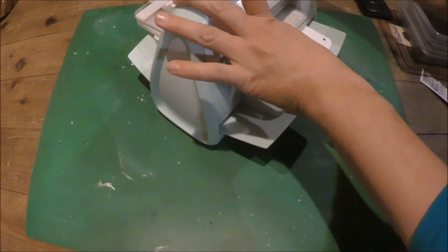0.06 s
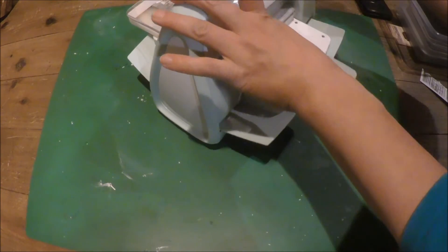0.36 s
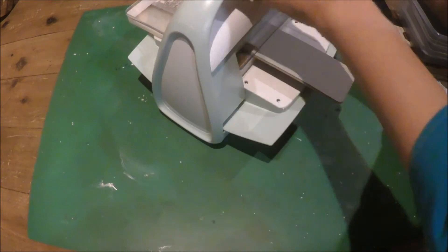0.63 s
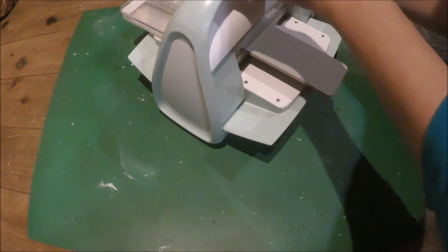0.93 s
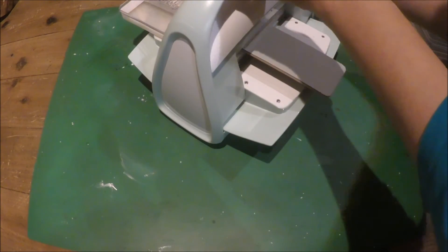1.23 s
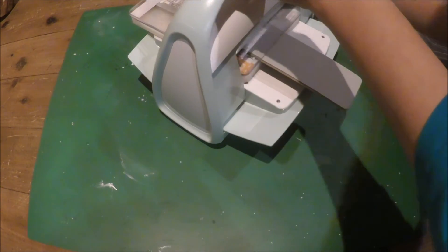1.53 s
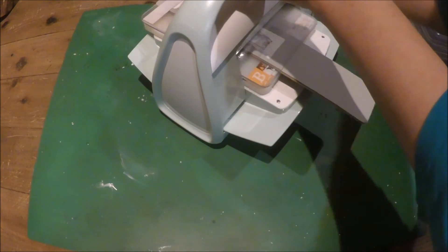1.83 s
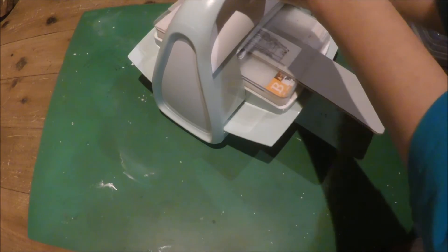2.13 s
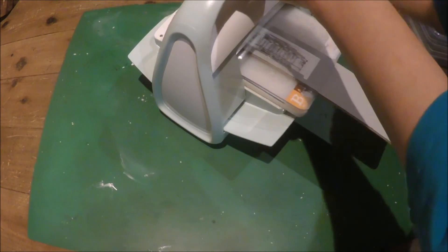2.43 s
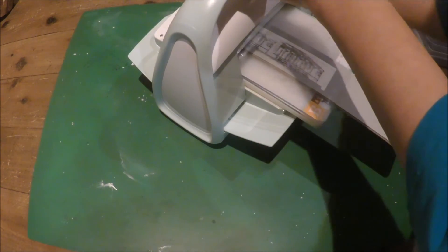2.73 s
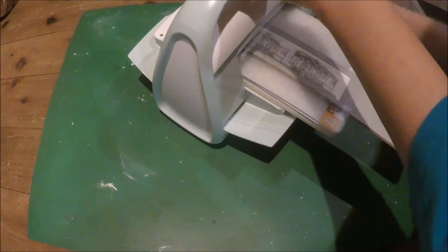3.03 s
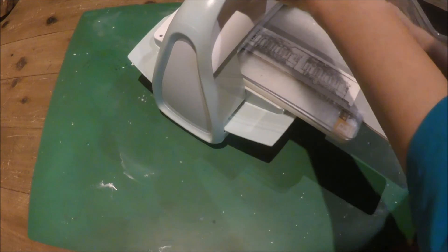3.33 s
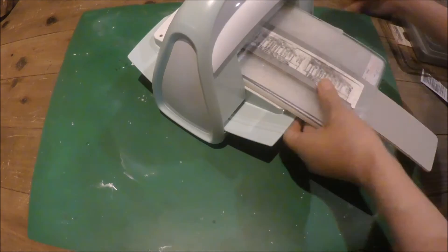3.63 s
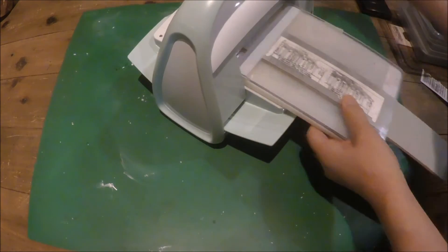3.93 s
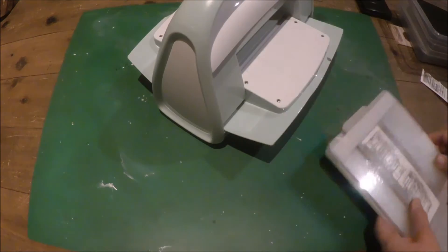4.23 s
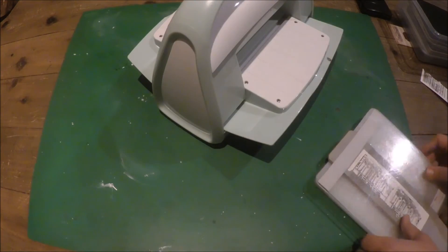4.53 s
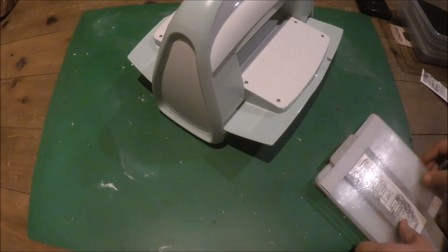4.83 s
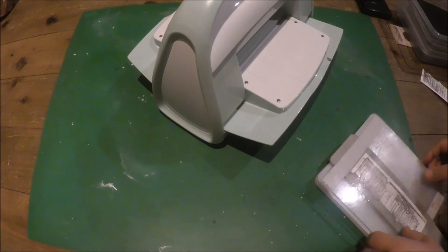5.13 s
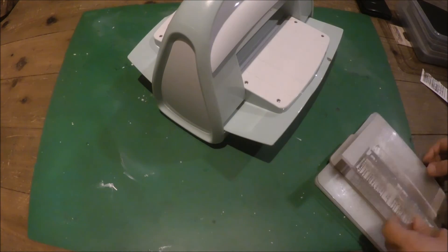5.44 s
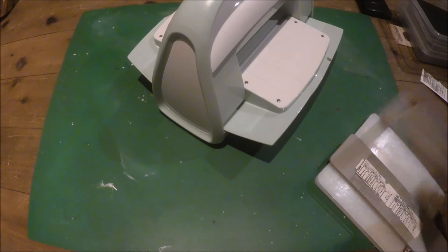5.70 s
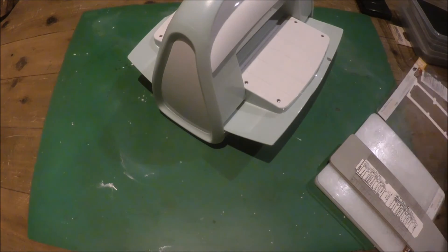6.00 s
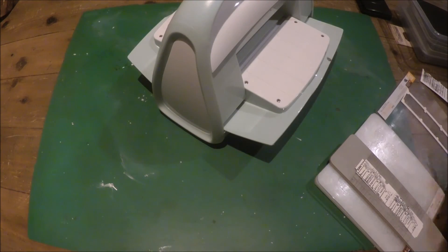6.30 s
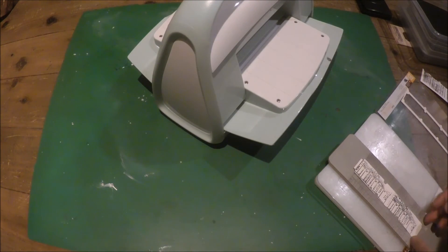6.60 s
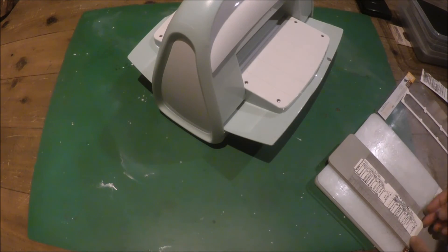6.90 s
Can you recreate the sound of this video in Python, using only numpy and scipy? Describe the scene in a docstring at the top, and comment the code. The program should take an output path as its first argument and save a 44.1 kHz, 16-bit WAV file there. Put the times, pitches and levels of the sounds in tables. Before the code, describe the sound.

A hand-cranked die-cutting machine turns with a low gear rumble, and a loud plastic clack comes almost at once. Plastic plates then creak, click and crunch through the rollers and snap free with another clack. The cranking stops. The plates scrape out, land on the table with a hard knock, and are clapped apart, with small rubs and clicks after. The sound is close and slightly dull, in a small room.

```python
"""A hand-cranked die-cutting machine

The machine stands on a mat-covered table, close by in a small room. Its gear teeth drive the resonances
of the plastic housing while a stack of plates creaks through the rollers by stick-slip and snaps free.
The plates are slid out, set down and clapped apart: friction makes them hiss, and impact excites their
damped modes. The hardest clacks overload the microphone."""
import sys
import numpy as np
from scipy import signal
from scipy.fft import rfft, irfft, next_fast_len
from scipy.io import wavfile
from scipy.ndimage import map_coordinates

SR = 44100
rng = np.random.default_rng(int(sys.argv[2]) if len(sys.argv) > 2 else 0)


def dump_mix(stems):
    """Bounce the given channels to the path in sys.argv[1] as a 16-bit WAV at rate SR."""
    frames = np.atleast_2d(stems).T  # one column per channel
    limited = np.clip(frames, -1, 1)  # hard clip at full scale
    pcm = np.round(limited * 32767).astype(np.int16)
    wavfile.write(sys.argv[1], SR, pcm)


N = 315756

# Modes of the feed tray and of one plate. Each row: frequency in Hz, level in dB, t60 in seconds.
TRAY_MODES = [(731, -3, 0.05), (778, -2.5, 0.0091), (885, 4, 0.016), (1014, 0, 0.03), (1110, -4, 0.021),
              (1240, -11.5, 0.039)]
PLATE_MODES = [(1526, -4.5, 0.024), (1708, -9.5, 0.044), (1850, -3, 0.032), (1943, -4, 0.04),
               (2050, -5, .035), (2290, -1.5, 0.018), (2370, -6, 0.045), (2664, -8.5, 0.015),
               (3305, -18, .025)]
# Spectrum of a struck edge. Each row: frequency in Hz, relative density in dB.
EDGE_SPECTRUM = [(200, -19), (900, 2.5), (2200, 0.5), (3500, -1), (5200, -12), (7000, -19), (15000, -20.5)]
# Resonances of the squeezed plates. Each row: frequency in Hz, width in Hz, level in dB.
SQUEEZE_PEAKS = [(968, 360, -1.5), (1087, 160, 5), (1850, 250, -5.5), (2590, 140, -13.5)]
# The stack is pulled out, set down, settled and opened.
# Each row: start and length in seconds, hiss and rub levels in dB.
HAND_MOVES = [(3.68, 0.58, -51.5, -48.5), (4.39, 0.51, -58.5, -46.5), (4.936, 0.38, -59.5, -55),
              (5.755, 0.21, -53, -52), (6.027, 0.323, -56, -47.5)]
# The rollers grip the stack, then free it; the pressure takes a moment to build and to ease.
GRIP_S, FREE_S, GRIP_RISE_S, FREE_FALL_S = 1.22, 3.2, .25, .15


def amp(db):
    """Decibels as an amplitude ratio."""
    return 10 ** (np.asarray(db) / 20)


def unit(x):
    """x scaled to rms 1."""
    return x / np.sqrt(np.mean(x ** 2) + 1e-20)


def along(points, hz):
    """Interpolation of (Hz, value) points on a logarithmic frequency axis."""
    f, v = np.transpose(points)
    return np.interp(np.log(hz + 1), np.log(f + 1), v)


def wobble(rate):
    """A smooth random curve with rate knots a second."""
    return map_coordinates(rng.standard_normal(int(N * rate / SR) + 4), [np.arange(N) * rate / SR])


def filtered(x, response):
    """Linear filtering: the spectrum of x times a complex frequency response."""
    m = next_fast_len(len(x) + 8192)
    return irfft(rfft(x, m) * response(np.fft.rfftfreq(m, 1 / SR)), m)[:len(x)]


def coloured(x, spectrum):
    """Spectral shaping of x by (Hz, dB) points, at rms 1."""
    return unit(filtered(x, lambda hz: amp(along(spectrum, hz))))


def resonate(x, peaks):
    """Forced vibration, at rms 1; a small body radiates little below its lowest resonance."""
    def response(f):
        bank = sum((-1) ** k * amp(db) * 1j * f * width / (hz * hz - f * f + 1j * f * width)
                   for k, (hz, width, db) in enumerate(peaks))
        return bank * f * f / (f * f + peaks[0][0] ** 2)
    return unit(filtered(x, response))


def grains(rate, spread_db):
    """Shot noise: tiny impulses of random size, on average rate a second."""
    return (rng.random(N) < rate / SR) * rng.standard_normal(N) * amp(spread_db * rng.standard_normal(N))


def waver(hz, drift, flutter_db):
    """A tone of rms 1, modulated in frequency and amplitude by an unsteady hand."""
    phase = 2 * np.pi * np.cumsum(hz * (1 + drift * wobble(25))) / SR
    return unit(np.sin(phase) * amp(flutter_db * wobble(22)))


def held(start, end, rise=.024, fall=.13):
    """An envelope that rises from start, holds at 1 until end and then falls."""
    t = np.arange(N) / SR
    return np.clip(np.minimum((t - start) / rise, 1 - (t - end) / fall), 0, 1)


def arch(start, length):
    """An envelope that swells and fades in one rounded arch."""
    progress = np.clip((np.arange(N) / SR - start) / length, 0, 1)
    return np.sqrt(np.abs(np.sin(np.pi * progress)))


def scattered(start, end, rate, db, spread_db):
    """Small events at log-normal intervals. Each row: time in seconds, level in dB."""
    gaps, sizes = rng.standard_normal((64, 2)).T
    times = start + np.cumsum(np.exp(gaps / 2)) / rate
    return [(s, db + spread_db * size) for s, size in zip(times, sizes) if s < end]


def ring(modes, attack, rattle):
    """Free vibration of damped modes, at peak 1; loose contact smears each mode into a band."""
    t = np.arange(SR // 4) / SR
    hz, db, t60 = np.transpose(modes)[:, :, None]
    size = amp(db + 1.5 * rng.standard_normal(hz.shape))
    detune = 1 + .012 * rng.standard_normal(hz.shape)
    sign = np.where(np.arange(len(hz)) % 3 == 2, -1, 1)[:, None]
    fading = size * np.exp(-np.log(1000) * t / t60)
    clean = np.sum(sign * fading * np.sin(2 * np.pi * hz * detune * t), axis=0)
    smear = resonate(rng.standard_normal(len(t)), [(f, f / 5, level) for f, level, _ in modes])
    wave = clean + rattle * smear * np.sqrt(np.sum(fading ** 2, axis=0) / 2)
    wave *= 1 - np.exp(-t / attack)
    return wave / np.abs(wave).max()


def crack(spectrum, t60):
    """Modal overlap: the crowded high modes of a struck edge merge into decaying noise."""
    t = np.arange(SR // 4) / SR
    return coloured(rng.standard_normal(len(t)), spectrum) * np.exp(-np.log(1000) * t / t60) / 2


def add(track, s, hit, wet_db):
    """Reverberation: a hit is placed at time s together with its diffuse tail in the room."""
    # Decay of the room. Each row: frequency in Hz, t60 in seconds.
    room_decay = [(150, 0.14), (1000, 0.18), (4000, 0.3), (10000, 0.23)]
    hz, t, noise = signal.stft(rng.standard_normal(len(hit)), SR, nperseg=256)
    decay = np.exp(-np.log(1000) * t / along(room_decay, hz)[:, None])
    tail = signal.istft(noise * decay, SR, nperseg=256)[1]
    tail = np.pad(tail / np.linalg.norm(tail), (SR // 200, 0))  # 5 ms behind the direct sound
    heard = hit + amp(wet_db) * signal.fftconvolve(hit, tail)[:len(hit)]
    start = round(s * SR)
    track[start:start + len(hit)] += heard[:N - start]


def effort():
    """The driving effort at the crank in dB, per sample; none once the hand lets go."""
    # Effort as the gear rumble it makes. Each row: time in seconds, level in dB.
    crank = [(0.0, -38), (0.36, -37.5), (0.55, -49), (0.72, -54.5), (0.83, -36.5), (1.0, -51),
             (1.17, -47.5), (1.3, -37), (1.47, -32.5), (1.62, -43), (2.14, -43), (2.4, -37), (2.68, -37),
             (3.17, -41), (3.33, -45), (3.43, -65.5)]
    s, db = np.transpose(crank)
    return np.interp(np.arange(N) / SR, s, db, right=-200)


def friction_gain(db, growth, grip_db):
    """Friction noise rises with load: by growth dB per dB of effort, and by grip_db in the rollers."""
    usual_effort_db = -35
    grip = held(GRIP_S, FREE_S, GRIP_RISE_S, FREE_FALL_S)
    return amp(db + growth * (effort() - usual_effort_db) + grip_db * grip)


def room_air():
    """The noise floor: the quiet room and the microphone's own hiss."""
    # Each row: frequency in Hz, relative density in dB.
    floor_spectrum = [(15, -49.5), (25, -18), (301, -1.5), (591, -4.5), (695, -3), (754, -10), (1040, -6.5),
                      (2220, -12), (3620, -14.5), (5200, -21), (7500, -26), (12000, -23.5), (16000, -15)]
    return amp(-54) * coloured(rng.standard_normal(N), floor_spectrum)


def gears():
    """Forced vibration: gear teeth shake the housing, and its base booms on the table."""
    # Resonances of gearbox and base. Each row: frequency in Hz, width in Hz, level in dB.
    gearbox_peaks = [(210, 26, -12.5), (335.3, 11, 0), (374.8, 13, 1), (453.3, 25, 0.5), (476, 41, -1),
                     (571, 52, -14), (731, 60, -14), (951, 19, -12.5)]
    base_peaks = [(109, 23, 1.5), (139.7, 27, 9)]
    # Gear tones that sing through the housing. Each row: frequency in Hz, level in dB.
    gear_tones = [(355, -9), (482, -6.5), (875, -20.5)]
    rumble = resonate(grains(rate=1100, spread_db=1), gearbox_peaks)
    boom = amp(-5) * resonate(grains(rate=430, spread_db=-1), base_peaks)
    whine = sum(amp(db) * waver(hz, drift=.025, flutter_db=1) for hz, db in gear_tones)
    return amp(effort()) * (rumble + boom + whine)


def crunch():
    """Micro-slip: clumps of tiny slips excite the resonances of the squeezed plates."""
    slips = grains(rate=1300, spread_db=3) * amp(2.5 * wobble(60))
    return friction_gain(-50, growth=.4, grip_db=2) * resonate(slips, SQUEEZE_PEAKS)


def sliding():
    """Sliding friction: plastic moved by roller or hand hisses and catches in tiny ticks."""
    # Each row: frequency in Hz, relative density in dB.
    hiss_spectrum = [(300, -34.5), (1000, -3), (2000, 2), (3500, 4), (5200, -2.5), (7000, -8),
                     (15000, -8.5)]
    gain = friction_gain(-54.5, growth=.2, grip_db=5.5)
    gain += sum(amp(db) * held(s, s + length) ** 2 for s, length, db, _ in HAND_MOVES)
    pressure = amp(1.5 * wobble(20))
    friction = unit(grains(rate=10000, spread_db=3))
    catches = amp(-11.5) * unit(grains(rate=20, spread_db=1))
    return pressure * gain * coloured(friction + catches, hiss_spectrum)


def clacks():
    """Impact excitation: plates snap against the machine, and once clap against each other; housing, tray and
    plate ring, edges buzz."""
    # Each row: time in seconds, housing, tray, plate and edge levels in dB, edge t60 in seconds.
    impacts = [(0.4135, -31.5, -21.5, -20.5, -34.5, .034), (0.428, -4, 5, -8, -16.5, .015),
               (0.4403, -3, -0.5, 3.5, -10, 0.023), (0.4479, -3, -6, -7, -25, .025),
               (0.553, -22, -12, -14, -15, 0.088), (3.1932, -22.5, -25.5, -9.5, -21.5, .02),
               (3.201, -6.5, 3, -12, -15, 0.025), (3.8767, -16.5, -20, -12, -9, 0.05),
               (4.0797, -43, -24, -21, -17.5, 0.058), (5.770, -23.5, 0, -17.5, -6.5, 0.022)]
    # Each row: frequency in Hz, level in dB, t60 in seconds.
    housing_modes = [(128, -14, 0.18), (196, -4.5, 0.11), (247, -7.5, 0.036), (315, 3.5, .09),
                     (360, -7.5, 0.14), (440.4, 2.5, 0.097), (555, -13, 0.081)]
    track = np.zeros(N)
    for s, housing_db, tray_db, plate_db, edge_db, edge_t60 in impacts:
        hit = amp(housing_db) * ring(housing_modes, attack=.0012, rattle=.22)
        hit += amp(tray_db) * ring(TRAY_MODES, attack=.0013, rattle=.21)
        hit += amp(plate_db) * ring(PLATE_MODES, attack=.001, rattle=.34)
        hit += amp(edge_db) * crack(EDGE_SPECTRUM, edge_t60)
        add(track, s, hit, wet_db=-32)
    return track


def strokes():
    """Friction on plastic: a light brush swishes, a pressed sheet squeaks, a dragged edge scrapes."""
    # Strokes of a hand or plate. Each row: start and length in seconds, swish, squeak and scrape in dB.
    gestures = [(.59, .125, -43, -67, -49), (3.496, .085, -46, -73, -51.5),
                (3.668, .066, -53, -50.5, -46.5), (3.816, .12, -52, -49, -37),
                (4.036, .09, -44.5, -60, -44), (4.375, .042, -47.5, -68.5, -45),
                (4.454, .028, -52, -40, -45), (5.584, .08, -55, -80, -64), (5.729, .04, -48.5, -44, -47),
                (6.136, .085, -49, -44, -47.5), (6.283, .043, -54, -42.5, -49)]
    # Each row: frequency in Hz, relative density in dB.
    swish_spectrum = [(400, -25.5), (1500, -8.5), (3500, 4.5), (7000, 0.5), (15000, -0.5)]
    # Resonances of the sheet. Each row: frequency in Hz, width in Hz, level in dB.
    sheet_peaks = [(2360, 70, 3.5), (3120, 150, -6.5), (3990, 120, -1.5), (5840, 130, -9.5)]
    swish = coloured(grains(rate=8000, spread_db=2.5), swish_spectrum)
    squeak = resonate(grains(rate=2500, spread_db=4), sheet_peaks)
    scrape = resonate(grains(rate=1200, spread_db=3), SQUEEZE_PEAKS)
    return sum(arch(s, length) * (amp(swish_db) * swish + amp(squeak_db) * squeak + amp(scrape_db) * scrape)
               for s, length, swish_db, squeak_db, scrape_db in gestures)


def landing(hit, spread, count=4):
    """Superposition: loose plates touch in turn within spread seconds, the later ones mostly harder."""
    order = np.arange(count)
    delays = (order + rng.random(count)) / count * spread
    sizes = (order + 1) * np.exp(rng.standard_normal(count) / 2)
    touches = sum(size * np.pad(hit, (round(delay * SR), 0))[:len(hit)]
                  for delay, size in zip(delays, sizes))
    return touches * np.linalg.norm(hit) / np.linalg.norm(touches)


def knocks():
    """Impact bandwidth: stack and table thud; harder contact reaches the high modes of tray and edges."""
    # Each row: time in seconds, knock and thump levels in dB, brightness in dB per step from stack
    # to tray to edge, landing time in seconds.
    bumps = [(1.201, -31, -53, -1.5, 0.0075), (1.241, -24, -31, -9.5, 0.0083), (3.7, -38, -35, 5, .012),
             (3.823, -30, -24, 0, .02), (3.853, -18, -27, 0.5, 0.0059), (4.085, -48, -38, 6, .01),
             (4.213, -53.5, -58, 12, 0.0042), (4.481, 2, -30.5, -5.5, 0.002914),
             (4.513, -21, -33.5, -17, 0.0046), (4.568, -29, -40, -7.5, .018),
             (4.628, -22.5, -27.5, -9, 0.023), (4.732, -20, -35.5, -7, 0.011),
             (4.835, -16, -28.5, -8.5, .012), (5.056, -32.5, -36.5, -1, .02),
             (5.742, -23.5, -50.5, -2.5, 0.0039), (5.7693, 1.5, -22, -4.5, 0.0022),
             (5.796, -22.5, -30.5, -4.5, 0.0095), (6.308, -18, -32, -2, .006),
             (6.325, -19.5, -47, -5, 0.0071)]
    # Each row: frequency in Hz, level in dB, t60 in seconds.
    table_modes = [(126, -9, 0.14), (140.4, -7, 0.22), (203, -11.5, 0.19)]
    stack_modes = [(276.8, -14.5, 0.21), (326.7, -4.5, 0.13), (367, 3, 0.048), (430.5, 3.5, 0.051),
                   (469, -4.5, 0.093), (545, -8.5, 0.084)]
    track = np.zeros(N)
    for s, knock_db, thump_db, bright_db, spread in bumps:
        thump = amp(thump_db) * ring(table_modes, attack=.0079, rattle=.22)
        stack = amp(knock_db) * ring(stack_modes, attack=.0023, rattle=.26)
        tray = amp(knock_db + bright_db - .5) * ring(TRAY_MODES, attack=.00036, rattle=.75)
        edge = crack(EDGE_SPECTRUM, t60=.024) + amp(-9) * ring(PLATE_MODES, attack=.0014, rattle=.75)
        edge *= amp(knock_db + 2 * bright_db)
        add(track, s, sum(landing(part, spread) for part in (thump, stack, tray, edge)), wet_db=-21.5)
    return track


def creaks():
    """Stick-slip under the rollers: each slip starts at another spot of the plate, so its pitch varies."""
    # Each row: time in seconds, peak level in dB.
    loud_slips = [(1.2161, -24.5), (1.6281, -24), (1.7705, -24.5), (1.873, -26.5), (1.8957, -22),
                  (2.025, -22), (2.0889, -16), (2.1321, -20), (2.2205, -17), (2.6393, -24.5),
                  (2.8506, -19.5), (2.9607, -27.5), (3.1433, -19.5), (3.178, -16), (3.2815, -22.5)]
    # Each row: frequency in Hz, level in dB, t60 in seconds.
    creak_modes = [(476.7, -11.5, 0.054), (854, -8, 0.027), (982, -19, 0.041), (1081, 1, 0.02),
                   (1162, 0, 0.0031), (1250, -22.5, 0.004), (1900, -6.5, 0.0049)]
    lesser_slips = scattered(GRIP_S + GRIP_RISE_S, FREE_S, rate=27, db=-34, spread_db=2.5)
    track = np.zeros(N)
    for s, db in loud_slips + lesser_slips:
        detune = np.exp(.053 * rng.standard_normal())
        modes = [(hz * detune, level, t60) for hz, level, t60 in creak_modes]
        add(track, s, amp(db) * ring(modes, attack=.0014, rattle=.41), wet_db=-10.5)
    return track


def judder():
    """Vibration under load: the rollers shake in short fits at one low, wavering pitch."""
    # Each row: start and length in seconds, level in dB.
    fits = [(1.32, 0.11, -40.5), (2.458, 0.17, -36), (2.663, 0.086, -33.5), (3.06, 0.12, -29)]
    envelope = sum(amp(db) * arch(s, length) for s, length, db in fits)
    return envelope * waver(hz=139, drift=.03, flutter_db=3)


def clicks():
    """Broadband transients: the die and plate edges click, with faint ticks as the stack is handled."""
    # Each row: time in seconds, level in dB, spectral peak in Hz.
    sharp = [(1.8, -16.5, 4400), (1.9305, -17.5, 2350), (2.0876, -17, 1850), (2.1296, -20, 2430),
             (2.38, -25, 1720), (2.6359, -22.5, 1880), (3.052, -24, 4400), (3.457, -28, 3000),
             (3.5965, -28, 4630), (3.767, -24, 5040), (3.8468, -20.5, 1770), (3.8655, -16, 1710),
             (4.176, -28, 1850), (4.499, -26, 2500), (4.843, -28, 3800), (5.138, -36.5, 2960),
             (5.7826, -15.5, 2510), (6.191, -25, 3900), (6.3065, -9, 3730), (6.3236, -21.5, 3180)]
    faint = [(s, db, 2820) for start, length, *_ in HAND_MOVES
             for s, db in scattered(start, start + length, rate=8.7, db=-41.5, spread_db=.5)]
    track = np.zeros(N)
    for s, db, hz in sharp + faint:
        spectrum = [(hz / 6, -22), (hz / 2, -6), (hz, 0), (hz * 2, -6), (hz * 4, -15)]
        add(track, s, amp(db + 1.67) * crack(spectrum, t60=.025), wet_db=-18)
    return track


def dragging():
    """Friction-driven resonance: dragging shakes the plates, and their chatter makes the tray hum."""
    # Resonances of plates and tray. Each row: frequency in Hz, width in Hz, level in dB.
    rub_peaks = [(122, 25, 6), (346, 24, 1.5), (487.5, 32, 3.5), (780, 61, -3), (1010, 240, -10.5),
                 (1850, 130, -23)]
    tray_peaks = [(482, 22, 0)]
    # Each row: start and length in seconds, level in dB.
    chatter_fits = [(3.969, 0.062, -44.5), (4.078, 0.066, -39), (4.211, 0.045, -39.5), (4.385, 0.046, -42)]
    drag = sum(amp(db) * held(s, s + length) ** 2 for s, length, _, db in HAND_MOVES)
    chatter = sum(amp(db) * arch(s, length) for s, length, db in chatter_fits)
    rub = amp(2.3 * wobble(25)) * drag * resonate(grains(rate=1200, spread_db=2), rub_peaks)
    hum = chatter * resonate(grains(rate=900, spread_db=3.5), tray_peaks)
    return rub + hum


def scene():
    """Superposition of all sources in one channel."""
    return (room_air() + gears() + crunch() + sliding() + clacks() + strokes() + knocks()
            + creaks() + judder() + clicks() + dragging())[None]


def record(dry):
    """Soft saturation: a dull microphone with a bass cut overloads, and a band limit follows."""
    # Microphone response. Each row: frequency in Hz, gain in dB.
    mic_response = [(20, 6), (5500, -3), (7000, -9.5), (7900, -17.5), (8800, -36.5), (11500, -44),
                    (13500, -19.5), (16000, -31)]
    low_cut_hz, top_hz = 34, 16200
    heard = filtered(dry[0], lambda hz: amp(along(mic_response, hz)) * (hz / (hz - 1j * low_cut_hz)) ** 2)
    clipped = heard / (1 + np.abs(heard) ** 8) ** (1 / 8)
    return filtered(clipped, lambda hz: hz < top_hz)[None]


dry = scene()
out = record(dry)
dump_mix(out)
```